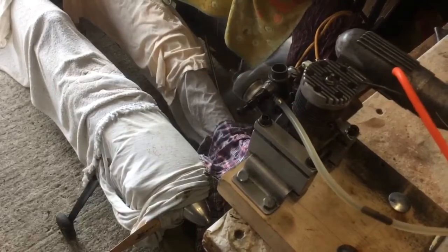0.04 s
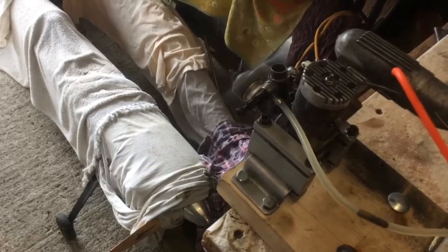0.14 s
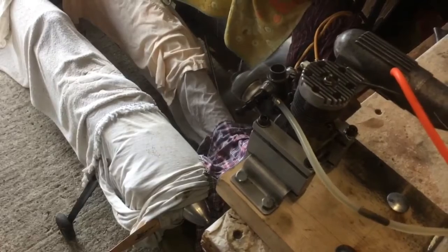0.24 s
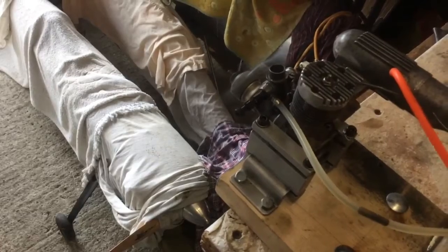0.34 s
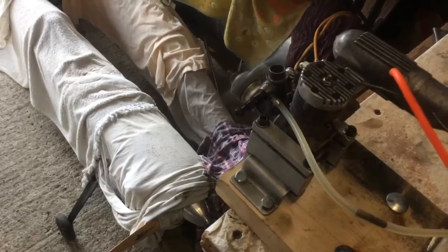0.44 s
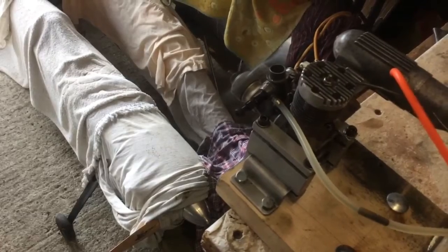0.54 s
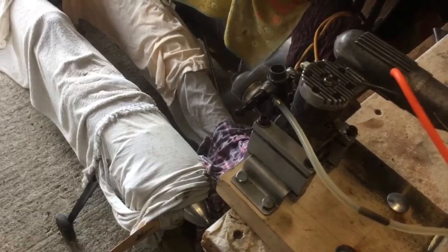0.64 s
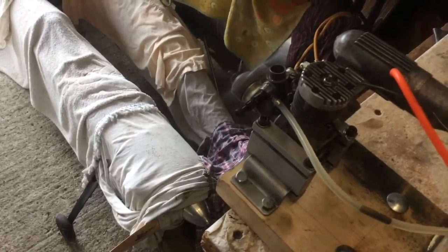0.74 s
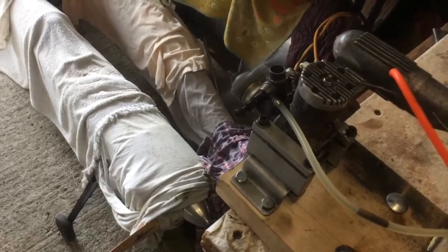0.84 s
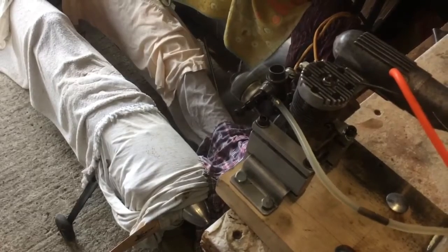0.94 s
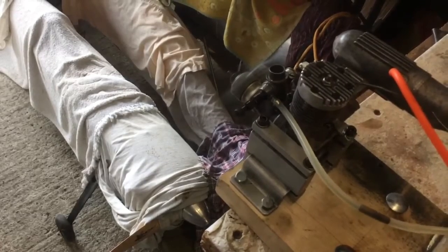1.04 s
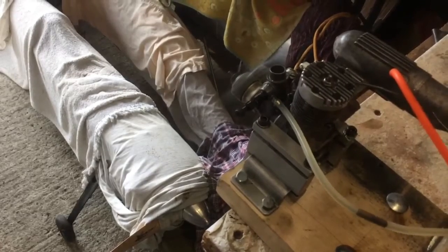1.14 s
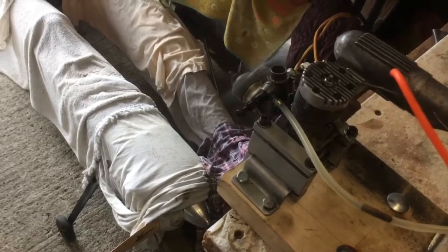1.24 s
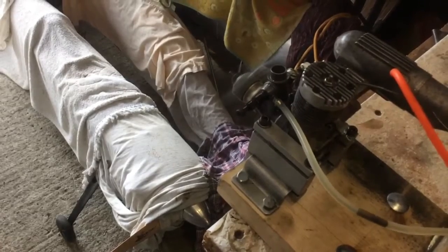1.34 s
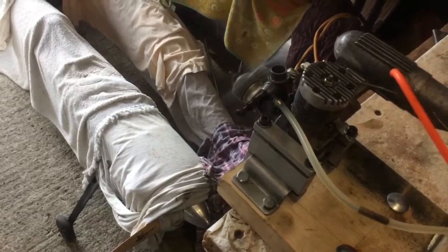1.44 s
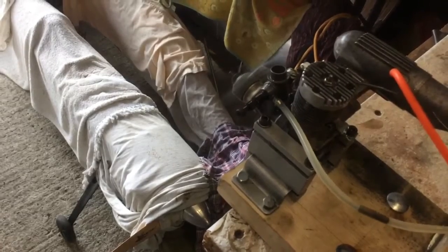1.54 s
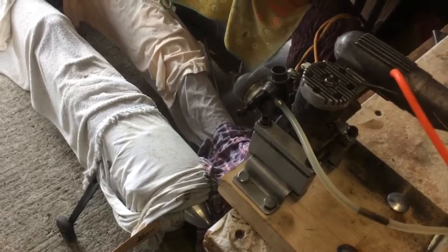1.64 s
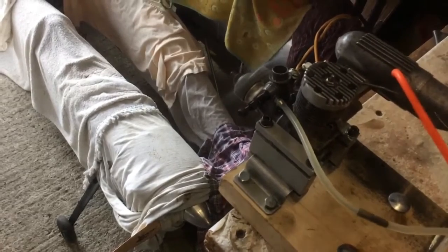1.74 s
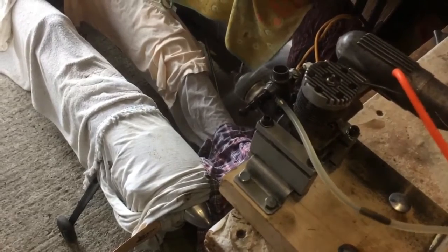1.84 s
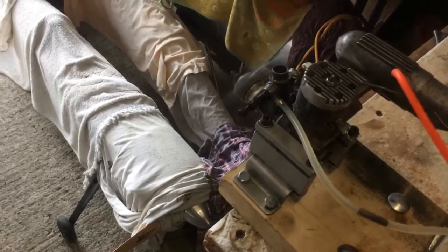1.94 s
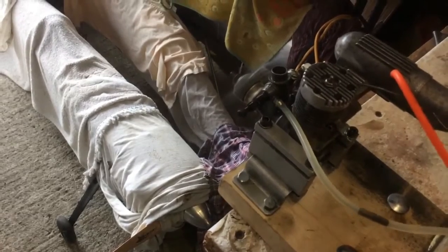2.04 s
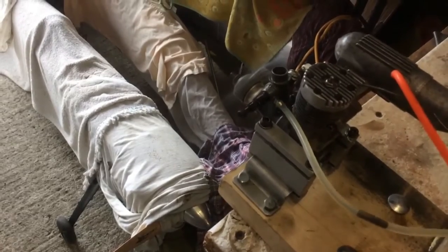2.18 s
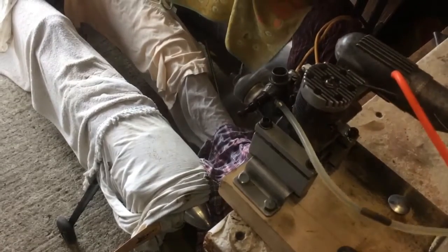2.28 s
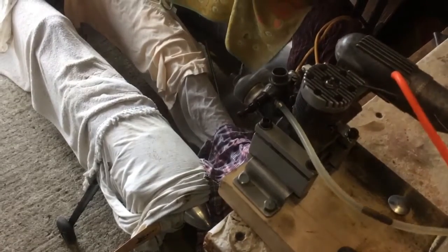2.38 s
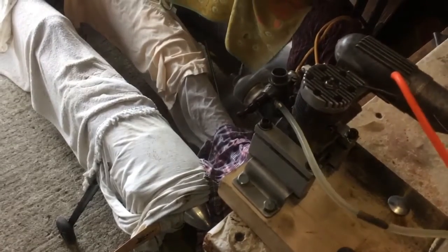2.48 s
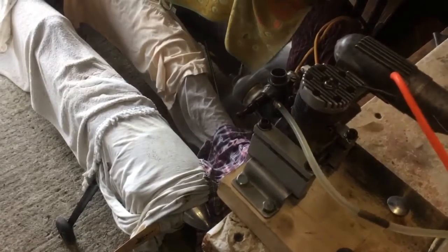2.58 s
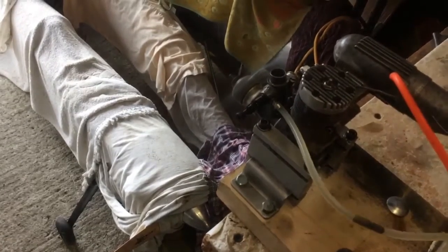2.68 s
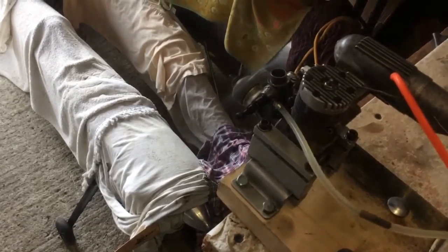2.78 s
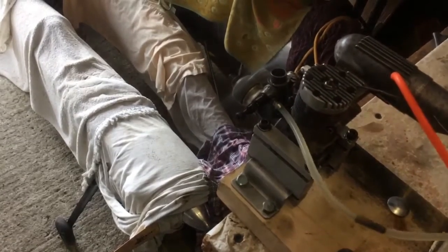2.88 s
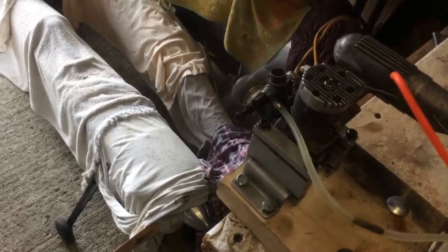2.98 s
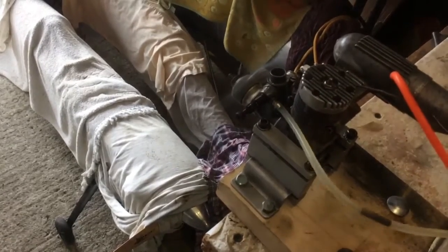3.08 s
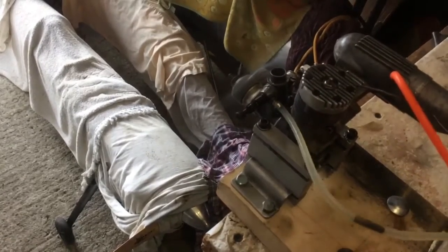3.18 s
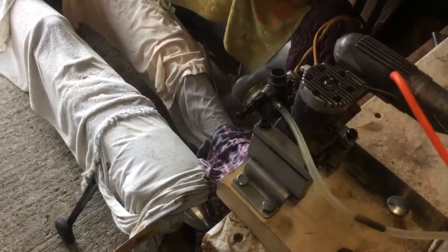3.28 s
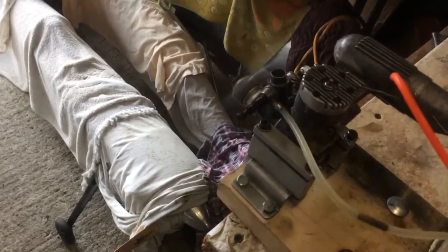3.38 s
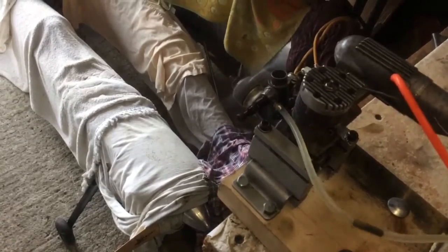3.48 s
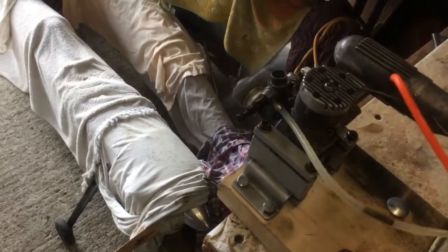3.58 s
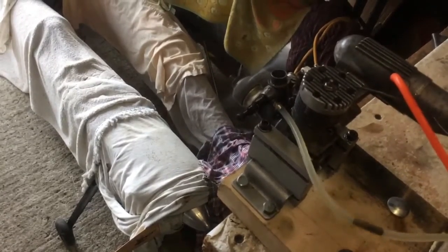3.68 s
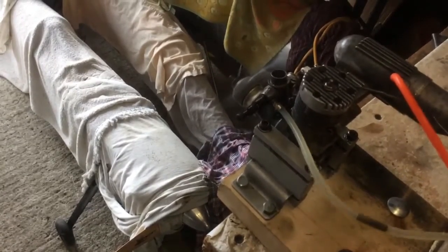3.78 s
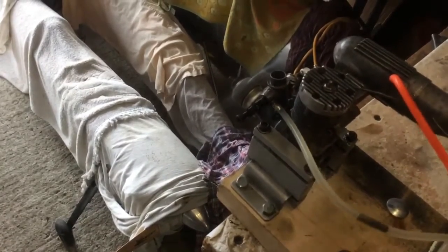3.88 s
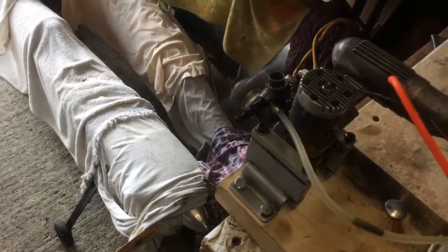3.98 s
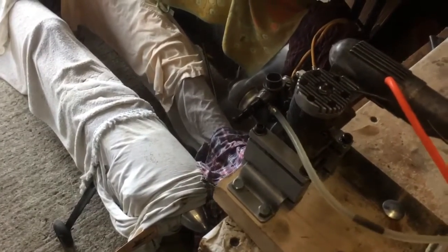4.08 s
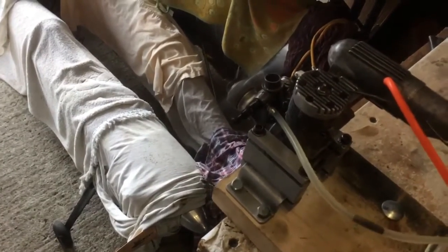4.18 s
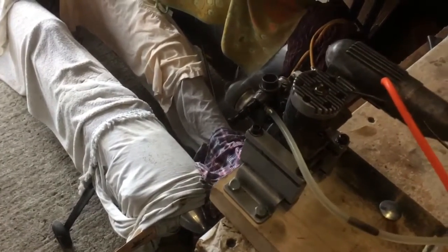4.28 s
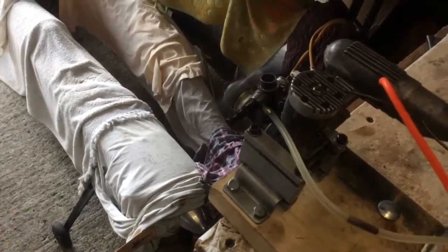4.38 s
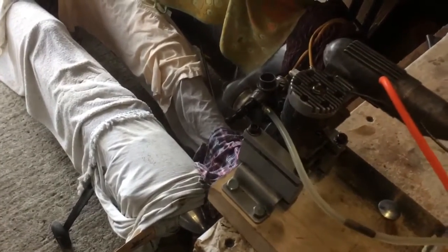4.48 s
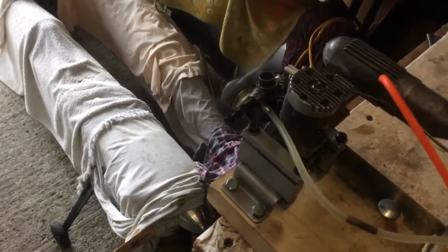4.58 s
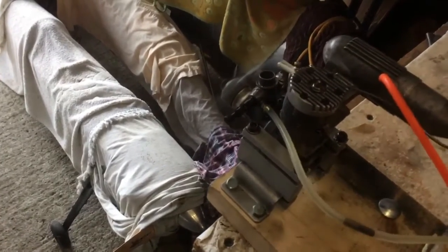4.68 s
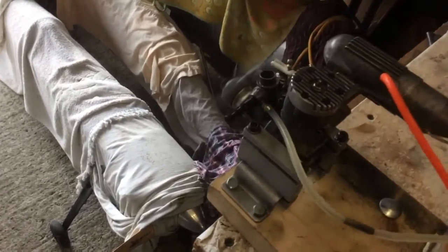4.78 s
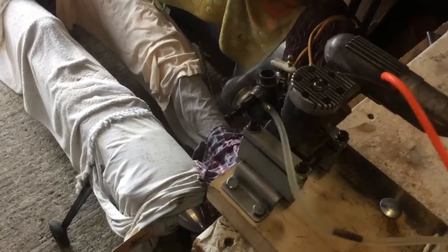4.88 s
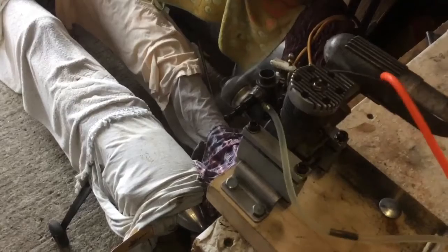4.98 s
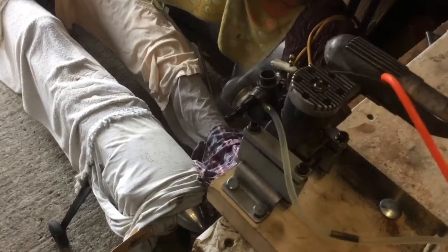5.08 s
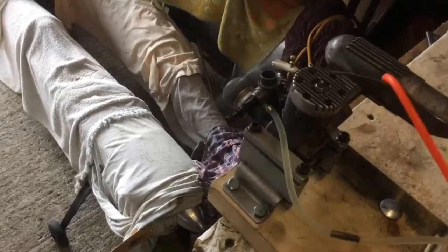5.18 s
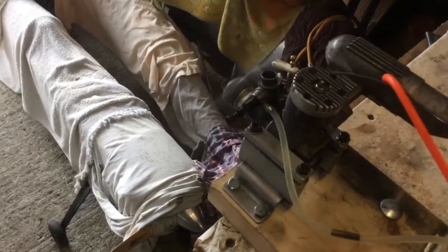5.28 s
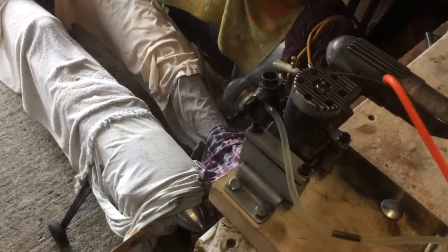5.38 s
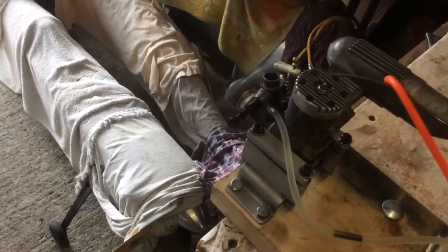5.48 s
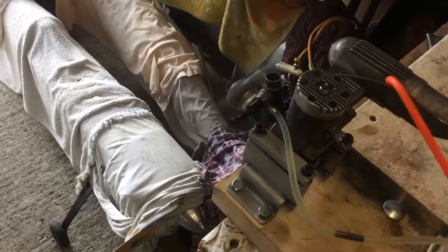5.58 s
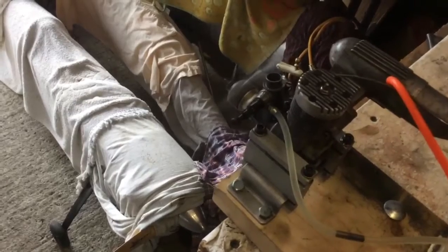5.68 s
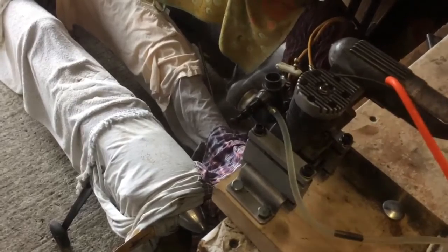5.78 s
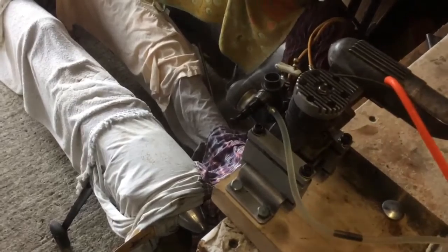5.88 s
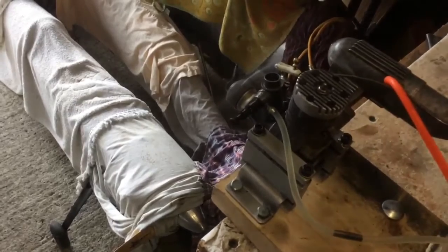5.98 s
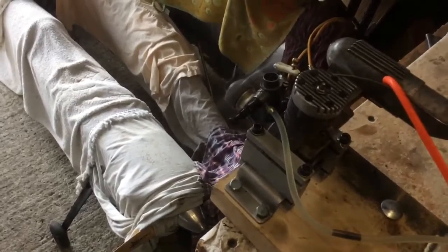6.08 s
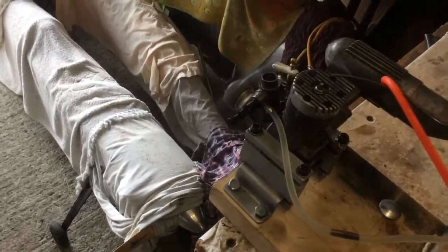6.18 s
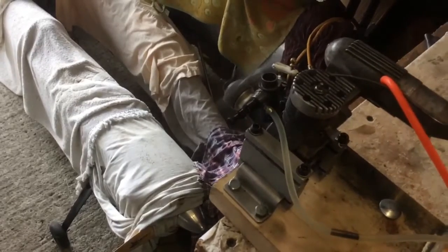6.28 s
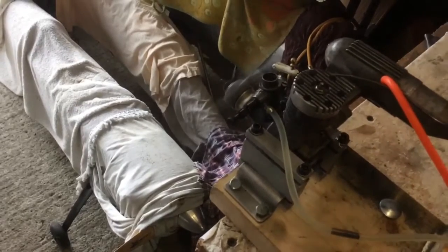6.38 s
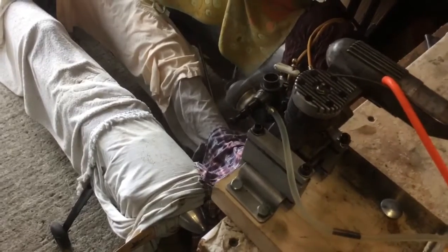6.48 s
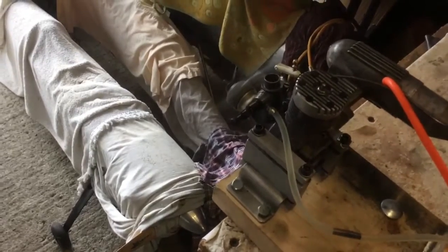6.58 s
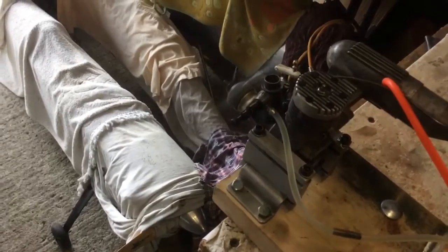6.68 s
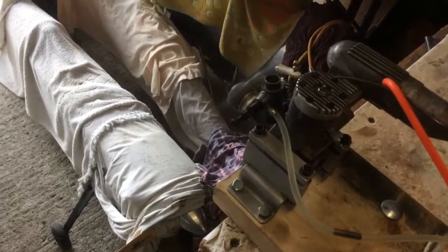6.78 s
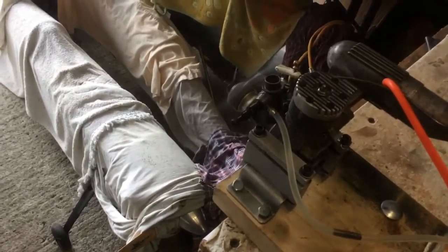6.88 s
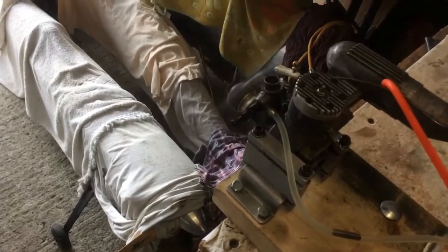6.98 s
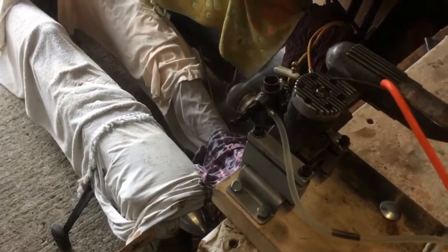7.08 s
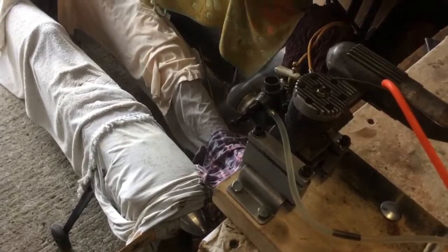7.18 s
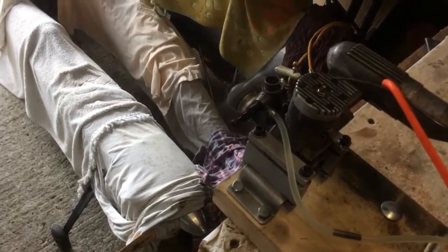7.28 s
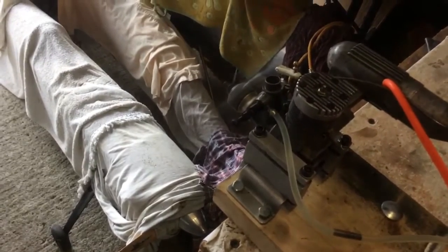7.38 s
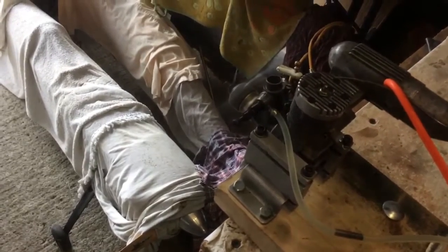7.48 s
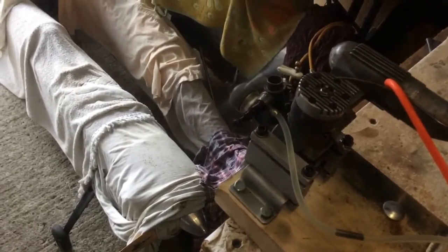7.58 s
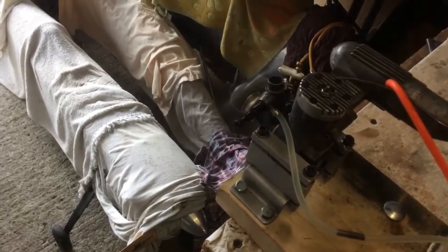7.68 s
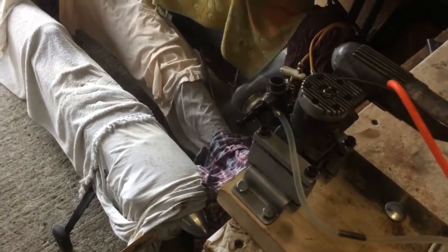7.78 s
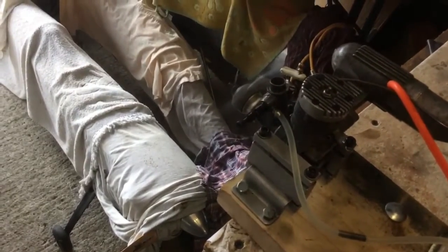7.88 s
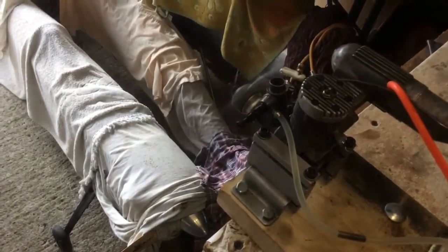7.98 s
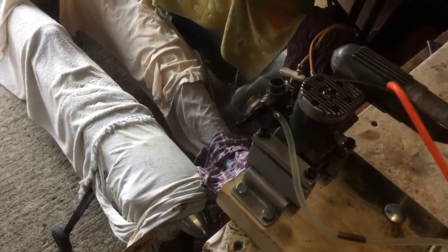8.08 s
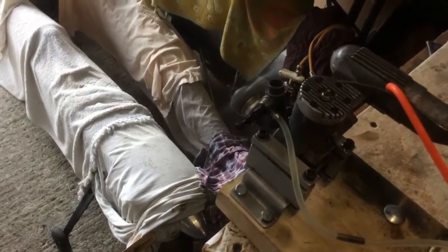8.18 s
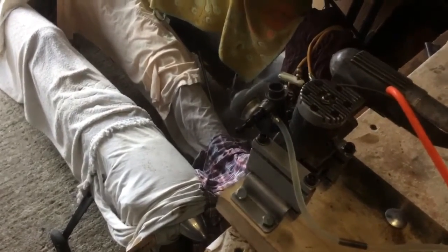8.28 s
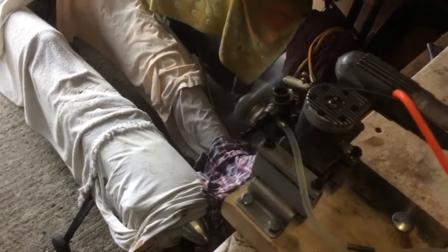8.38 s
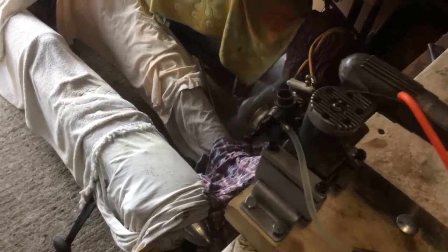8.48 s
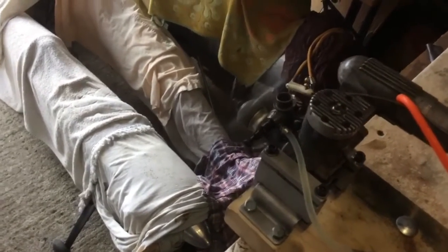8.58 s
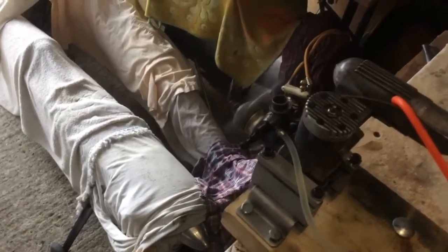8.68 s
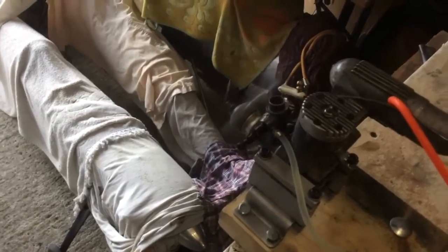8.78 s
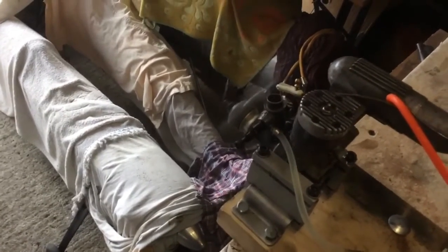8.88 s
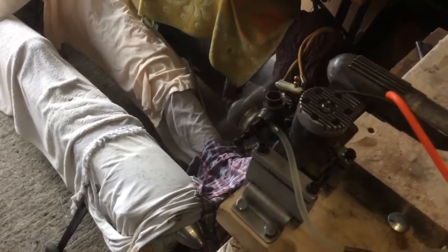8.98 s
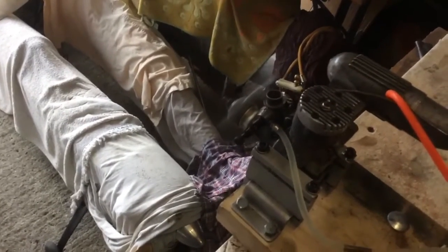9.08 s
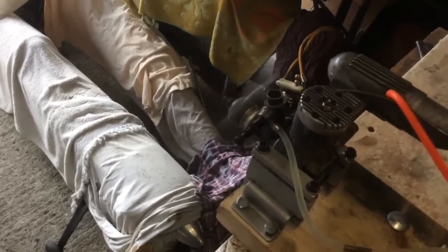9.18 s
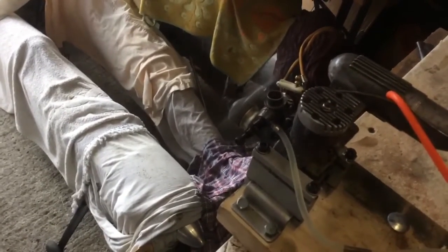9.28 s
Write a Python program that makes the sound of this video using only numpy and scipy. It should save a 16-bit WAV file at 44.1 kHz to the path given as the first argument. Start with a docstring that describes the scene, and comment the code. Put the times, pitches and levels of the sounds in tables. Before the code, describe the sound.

Loud raspy buzz of a tiny propeller engine at full speed, running down quickly into separate pops and clattering idle with occasional misfires.

```python
"""A small two-stroke glow engine with a propeller runs flat out on a wooden test stand, close by.
At first, exhaust pulses merge into a buzz, with a treble rasp, rushing gas and propeller tones over wash.
Soon after 2 s three puffs of that wash bump the microphone.
Near 4.8 s the throttle closes and the engine runs down; buzz and rasp fade and single pops come through.
It settles to a putting, ticking idle with a weak firing now and then; nearby walls answer the clatter."""
import sys
import numpy as np
from scipy import signal
from scipy.fft import rfft, irfft, next_fast_len
from scipy.io import wavfile
from scipy.ndimage import map_coordinates

SR = 44100
rng = np.random.default_rng(int(sys.argv[2]) if len(sys.argv) > 2 else 0)


def unload_wav(signal):
    """Save mono or channel-first audio to the path in sys.argv[1] as 16-bit WAV at rate SR, clipped to [-1, 1]."""
    wavfile.write(
        sys.argv[1],
        SR,
        np.round(np.clip(np.atleast_2d(signal).T, -1, 1) * 32767).astype(np.int16),
    )


N = 411894  # length in samples

# Levels in the tone-colour tables are relative: each layer is scaled afterwards.
# exhaust pipe and its surroundings at full throttle: [f/Hz, level/dB]
EXHAUST_COLOUR = [(400, -50), (575, -16), (770, -16), (963, -21), (1156, -17), (1349, -18), (1541, -9.5),
                  (1734, -9.5), (1927, -14), (2120, -32), (2312, -24), (2700, -25), (2890, -29),
                  (3083, -22), (3470, -23), (3660, -21), (3853, -14), (4046, -23), (4240, -20), (4430, -35),
                  (4625, -22), (4820, -23), (5200, -36), (6000, -60)]
# rasp of the ports and the metal at full throttle: [f/Hz, level/dB]
RASP_COLOUR = [(4400, -31), (5000, -10), (5390, -3.5), (5590, -0.5), (5800, -11.5), (6550, -12),
               (7130, -18), (7320, 0), (7520, 2.5), (7750, -4), (8200, 0), (8500, -10.5), (9550, -4),
               (9850, -7), (10150, -20.5), (11600, -19.5)]
# turbulent gas and air at full throttle: [f/Hz, level/dB]
RUSH_COLOUR = [(30, -20), (90, -15.5), (160, 1), (260, -6), (500, -9.5), (1000, -13.5), (1450, -10.5),
               (1780, -2), (2050, -11), (2400, -9.5), (2600, -14.5), (3600, -10.5), (4250, -13.5),
               (6900, -17), (7400, -11.5), (9600, -14.5), (10300, -23.5)]
# air stirred by the propeller: [f/Hz, level/dB]
WASH_COLOUR = [(25, -30), (80, -4), (140, 0), (300, 4.5), (600, 1), (1200, -5.5), (2400, -17.5),
               (5400, -14.5), (9000, -18.5), (11500, -27.5)]
# bark of one idle firing: [f/Hz, level/dB]
BARK_COLOUR = [(200, -20), (450, -19), (690, 2), (860, 3), (1120, 0.5), (1330, -19), (1700, -8.5),
               (2300, -27), (3500, -73)]
# gas resonances of the muffler: [f/Hz, width/Hz, level/dB]
MUFFLER_MODES = [(160, 77, -9), (222.6, 19, 0.5), (273.6, 32.6, 4), (388, 170, -10)]
# ringing of mount and stand: [f/Hz, width/Hz, level/dB]
STAND_MODES = [(1546, 69, 5), (1877, 86, -13), (2110, 85, -22)]
# ringing metal of cylinder and crankcase: [f/Hz, width/Hz, level/dB]
METAL_MODES = [(2540, 74, -12.5), (3620, 68, -7), (4230, 130, -6.5), (5147, 80, 3), (5490, 145, -1.5),
               (6570, 64, -5.5), (7360, 85, -4.5), (8300, 250, -26), (8700, 380, -22)]
# puffs of wash on the microphone: [t/s, length/s, level/dB]
MIC_PUFFS = [(2.015, .012, -23), (2.21, 0.0069, -23), (2.34, 0.021, -25)]
# time the walls' answer takes to fall by 60 dB: [f/Hz, decay/s]
ROOM_DECAY = [(200, 0.79), (1500, 0.63), (10000, 0.27)]
# crankshaft speed with the throttle wide open, one firing a turn: [t/s, speed/(turns/s)]
TOP_SPEED_CURVE = [(0.3, 192.35), (0.85, 193.02), (1.5, 192.4), (2.15, 192.77), (2.4, 193.36),
                   (2.65, 192.3), (3.2, 192.46), (3.7, 193.79), (4.0, 192.38), (4.6, 192.55)]
# crankshaft speed with the throttle closed, hunting a little: [t/s, speed/(turns/s)]
IDLE_SPEED_CURVE = [(5.6, 56.9), (6.3, 56.13), (6.9, 56.1), (7.1, 57.0), (7.75, 58.07), (8.0, 57.28),
                    (8.65, 57.28), (8.85, 58.11), (9.34, 54.84)]
# idle firings in which the charge burns weakly: [t/s, level/dB]
WEAK_FIRINGS = [(5.649, -9), (6.353, -4), (6.549, -17), (6.71, -4), (7.135, -16), (7.571, -4), (7.83, -20),
                (8.091, -20), (8.178, -18), (8.684, -11), (9.067, -12), (9.156, -11), (9.281, -10)]

CLOSE_S, CLOSE_EASE_S = 4.829, .0385  # the throttle is half shut at this time; how gently it moves
RUN_DOWN_S = .173  # time constant with which crankshaft and propeller lose speed
FIRING_S = 7.898  # a firing falls about here, which sets the crank angle
SHAFT_TOP_DB, SHAFT_IDLE_DB = -16, -46.5  # rms of the propeller's once-a-turn tone, flat out and idling
BLADE_TOP_DB, BLADE_IDLE_DB = -12, -32.5  # rms of its blade-passing tone, flat out and idling
BURN_SCATTER_DB = .7  # no two idle charges burn quite alike
# power flat out; what shutting the throttle takes; the fall each time the revs above idle halve
POWER_DB, CHOKE_DB, POWER_DB_PER_HALVING = -0.85, 4, 8.5
# relative strength of the pops at idle; how far they sink well above these revs (0-1)
POP_IDLE_DB, POP_FADE_DB, POP_REVS = 1, 13, 0.2
# the buzz nears this loss as the revs slip below the pipe's tuning; the share of slip that matters
OFF_PIPE_DB, PIPE_BAND = 3, 0.044
TOP_HZ = 11750  # the recorder's band limit


def amp(db):
    """Decibels to gain."""
    return 10 ** (np.asarray(db) / 20)


def unit(x):
    """Scale the whole signal to rms 1."""
    return x / np.sqrt(np.mean(x ** 2) + 1e-20)


def along(points, hz):
    """Read (Hz, value) points on a log frequency axis."""
    f, v = np.transpose(points)
    return np.interp(np.log(hz + 1), np.log(f + 1), v)


def curves(rows):
    """One value per sample for each column after the time."""
    s, *cols = np.transpose(rows)
    return [np.interp(np.arange(N) / SR, s, c) for c in cols]


def wobble(rate):
    """A smooth random curve with this many random knots a second."""
    knots = rng.standard_normal(int(N * rate / SR) + 4)
    return map_coordinates(knots, [np.arange(N) * rate / SR])


def filtered(x, response):
    """Multiply the spectrum of x by a complex response of frequency."""
    size = 2 * next_fast_len(N // 2 + SR // 4)
    return irfft(rfft(x, size) * response(np.fft.rfftfreq(size, 1 / SR)), size)[:N]


def coloured(x, spectrum):
    """Shape x by (Hz, dB) points, with a filter that never sounds ahead of its input."""
    def response(hz):
        # folding the cepstrum (the spectrum of the log gain) gives the least possible delay
        cepstrum = irfft(np.log(amp(along(spectrum, hz))))
        cepstrum[1:len(hz) - 1] *= 2
        cepstrum[len(hz):] = 0
        return np.exp(rfft(cepstrum))
    return filtered(x, response)


def resonate(x, modes):
    """Let x ring a set of (Hz, width in Hz, dB) resonances with alternating sign."""
    def response(hz):
        total = 0
        for k, (centre, width, db) in enumerate(modes):
            damping = 1j * hz * width
            total = total + (-1) ** k * amp(db) * damping / (centre * centre - hz * hz + damping)
        return total
    return filtered(x, response)


def high_pass(x, hz, order):
    """Take away the lows, using only past samples."""
    return signal.sosfilt(signal.butter(order, hz, "high", fs=SR, output="sos"), x)


def pulses(times, sizes):
    """Sharp clicks placed exactly, even between samples."""
    at = times[:, None] * SR
    taps = np.floor(at).astype(int) + np.arange(-7, 9)
    shape = np.sinc(taps - at) * np.sinc((taps - at) / 8)
    return np.bincount(np.clip(taps, 0, N).ravel(), (sizes[:, None] * shape).ravel(), N + 1)[:N]


def throttle():
    """Wide open (1), then shut (0) in one smooth move."""
    return .5 - .5 * np.tanh((np.arange(N) / SR - CLOSE_S) / (2 * CLOSE_EASE_S))


def coast(opening):
    """Revs from 1 (flat out) to 0 (idle): inertia makes them lag behind the throttle."""
    keep = np.exp(-1 / (RUN_DOWN_S * SR))
    lost = signal.lfilter([1 - keep], [1, -keep], 1 - opening)
    return np.clip(1 - lost, 1e-6, 1)


def crankshaft(revs):
    """Turns made so far; the slower the shaft turns, the more it wavers."""
    (top,), (low,) = curves(TOP_SPEED_CURVE), curves(IDLE_SPEED_CURVE)
    speed = low + (top - low) * revs
    turns = np.cumsum(speed) / SR
    turns = turns - turns[round(FIRING_S * SR)] % 1
    return turns + .85 / speed * wobble(14) + .0013 * wobble(60)


def firing_times(turns):
    """The plug lights the charge once a turn, at each whole turn."""
    return np.interp(np.arange(np.ceil(turns[0]), turns[-1]), turns, np.arange(N) / SR)


def full_throttle(turns, revs, opening):
    """Buzz, rasp, a rush of gas that swells once a turn and a sputtering hiss, all following the power."""
    power_db = POWER_DB - CHOKE_DB * (1 - opening) + POWER_DB_PER_HALVING * np.log2(revs)
    buzz = amp(-17.0) * exhaust(turns, smear_s=.004, flutter_db=0.7, chamber_hz=1728, width_hz=227)
    ports = rasp(turns, size_db=1.0, second_hit=0.34)
    echoed = nearby_echo(ports, echo_db=-6.0, delay_s=.0023, sway_s=4e-5)
    edge = amp(-19.5 + 0.62 * wobble(9)) * unit(echoed)
    swelling = rng.standard_normal(N) * amp(3 * np.cos(2 * np.pi * turns))
    gas = amp(-24) * unit(coloured(swelling, RUSH_COLOUR))
    hiss_colour = [(2300, -43), (3000, -9.5), (3400, -7.5), (4400, -33.0)]
    hiss = unit(coloured(rng.standard_normal(N), hiss_colour))
    sputter = amp(-31.5 + 3.2 * wobble(50) + 1.5 * wobble(9.9)) * hiss
    on_pipe = amp(-OFF_PIPE_DB * np.tanh((1 - revs) / PIPE_BAND))
    return amp(power_db) * (on_pipe * buzz + edge + gas + sputter)


def exhaust(turns, smear_s, flutter_db, chamber_hz, width_hz):
    """At speed the pulses merge into a buzz; the pipe delays low tones, so each is a falling chirp."""
    times = firing_times(turns)
    blasts = pulses(times, amp(flutter_db * rng.standard_normal(len(times))))
    chirps = filtered(blasts, lambda hz: np.exp(-2j * np.pi * smear_s * hz * (1 - hz / 12000)))
    # the muffler chamber holds the tones near its resonance and lets them go late
    held = filtered(chirps, lambda hz: np.exp(-2j * np.arctan(2 * (hz - chamber_hz) / width_hz)))
    return unit(coloured(held, EXHAUST_COLOUR))


def rasp(turns, size_db, second_hit):
    """Sharp edges as the exhaust port and then the transfer port open ring in the treble."""
    edges = 0
    for lag_turns, size in [(0, 1), (.29, second_hit)]:
        times = firing_times(turns - lag_turns)
        chance = rng.standard_normal((len(times), 2))
        jittered = times + 2e-6 * chance[:, 0]
        edges = edges + pulses(jittered, size * amp(size_db * chance[:, 1]))
    return unit(coloured(edges, RASP_COLOUR))


def nearby_echo(x, echo_db, delay_s, sway_s):
    """A reflection through the churning air makes the upper partials flicker in strength."""
    delay = delay_s + sway_s * (wobble(2.976) + 0.71 * wobble(16))
    return x + amp(echo_db) * map_coordinates(x, [np.arange(N) - delay * SR])


def idle(turns, revs, opening):
    """Each firing puffs through the muffler, barks, rings the stand and ticks in the metal."""
    times = firing_times(turns)
    chance = rng.standard_normal((len(times), 2))
    burn_db = BURN_SCATTER_DB * chance[:, 0]
    for s, db in WEAK_FIRINGS:
        burn_db[np.argmin(abs(times - s))] = db
    times = times + 1.5e-4 * chance[:, 1]
    # the pops stand apart only once the throttle is shut and the revs have fallen
    coasting = 1 / (1 + (POP_REVS / revs) ** 4)
    pop_db = POP_IDLE_DB - POP_FADE_DB * coasting - 30 * opening
    level_db = np.interp(times, np.arange(N) / SR, pop_db)
    # the piston pumps gas through the muffler even when the charge hardly burns
    strokes = pulses(times, amp(level_db + 0.23 * burn_db))
    puff_colour = [(80, -36), (160, 2.0), (500, 2), (2000, -31)]
    puff = amp(-30.0) * unit(coloured(resonate(strokes, MUFFLER_MODES), puff_colour))
    # the share of a charge that fails to burn leaves with a dull thud
    unburnt = pulses(times, amp(level_db) * (1 - amp(burn_db)))
    thud_colour = [(60, -30), (125, 4), (190, 2), (300, -6), (600, 0), (900, -6), (1500, -25), (3000, -55)]
    thud = amp(-42) * unit(coloured(unburnt, thud_colour))
    burns = pulses(times, amp(level_db + burn_db))
    bark = amp(-28.0) * unit(coloured(burns, BARK_COLOUR))
    ring_colour = [(600, -17.5), (1300, -7.0), (2000, 4.0), (4000, -19.5)]
    ring = amp(-34.5) * unit(coloured(resonate(burns, STAND_MODES), ring_colour))
    # the metal keeps rattling while the pops are still faint
    metal = ticks(times, 0.14 * level_db + burn_db, knock_db=3.0, scrape_s=0.0057)
    clatter = bark + ring + metal
    return puff + thud + clatter + amp(-14.5) * room(clatter)


def ticks(times, level_db, knock_db, scrape_s):
    """The piston slaps just after the burn: the metal rings, with a short scrape of contacts."""
    slaps = pulses(times + 0.000612, amp(level_db))
    ring = unit(high_pass(resonate(slaps, METAL_MODES), 2000, order=2))
    contact_db = level_db + knock_db * rng.standard_normal(len(times))
    contacts = pulses(times + 0.00029, amp(contact_db))
    # each contact starts a burst of noise that dies away
    fading = signal.lfilter([1], [1, -np.exp(-1 / (scrape_s * SR))], contacts)
    scrape = fading * rng.standard_normal(N)
    grit_colour = [(1200, -38), (2000, 4), (3000, -7.0), (4250, 0.5), (4750, -8), (5400, 5), (6000, -4.0),
                   (7350, 5), (7800, -6), (9300, -7), (11000, -16)]
    grit = unit(coloured(scrape, grit_colour))
    return amp(-38.5) * ring + amp(-38) * grit


def propeller(turns, revs):
    """Two clean tones that grow with the revs: one at the shaft speed, one at the passing of two blades."""
    shaft_db = SHAFT_IDLE_DB + (SHAFT_TOP_DB - SHAFT_IDLE_DB) * revs
    blade_db = BLADE_IDLE_DB + (BLADE_TOP_DB - BLADE_IDLE_DB) * revs
    angle = 2 * np.pi * turns
    shaft_tone = amp(shaft_db) * np.cos(angle - 2.5)
    blade_tone = amp(blade_db) * np.cos(2 * angle + 1.66)
    return np.sqrt(2) * (shaft_tone + blade_tone)


def wash(turns):
    """Air chopped by the two blades, with a few puffs that hit the microphone as low rumble."""
    air = rng.standard_normal(N) * amp(2 * np.cos(4 * np.pi * turns))
    t = np.arange(N) / SR
    puffs = sum(amp(db) * np.exp(-.5 * ((t - s) / length) ** 2) for s, length, db in MIC_PUFFS)
    rumble_colour = [(20, -8), (50, -9), (140, 0), (300, -16), (800, -66)]
    rumble = unit(coloured(rng.standard_normal(N), rumble_colour))
    return amp(-32.5) * unit(coloured(air, WASH_COLOUR)) + puffs * rumble


def room(x):
    """A short diffuse answer of the walls, made of noise that dies faster in the treble."""
    hz, t, z = signal.stft(rng.standard_normal(SR // 3), SR, nperseg=256)
    decay = amp(-60 * t / along(ROOM_DECAY, hz)[:, None])
    tail = signal.istft(z * decay, SR, nperseg=256)[1]
    late = np.pad(x, (SR // 300, 0))  # the answer starts 1/300 s late
    return signal.fftconvolve(late, tail / np.linalg.norm(tail))[:N]


def scene():
    """The throttle sets the revs, and one crankshaft drives every layer."""
    opening = throttle()
    revs = coast(opening)
    turns = crankshaft(revs)
    engine = full_throttle(turns, revs, opening) + idle(turns, revs, opening)
    return (engine + propeller(turns, revs) + wash(turns))[None]


def record(dry):
    """The recorder clips at full scale and keeps almost nothing above its band limit."""
    clipped = np.clip(dry[0], -1, 1)
    return filtered(clipped, lambda hz: 1 / np.sqrt(1 + (hz / TOP_HZ) ** 160))[None]


dry = scene()
out = record(dry)
unload_wav(out)
```